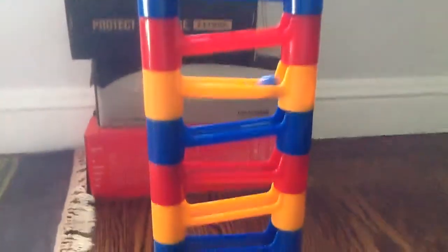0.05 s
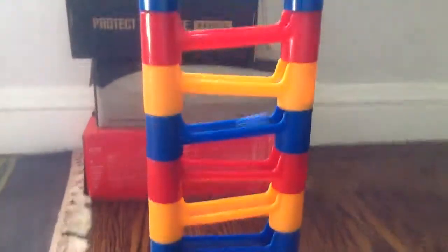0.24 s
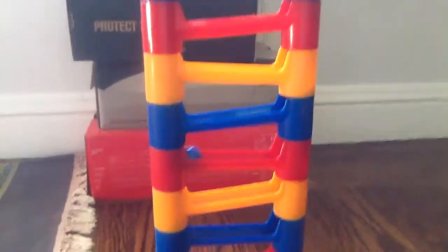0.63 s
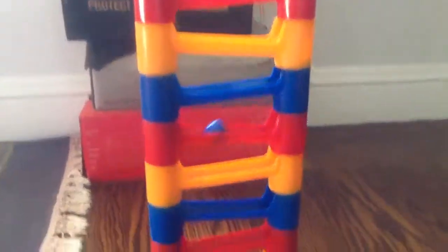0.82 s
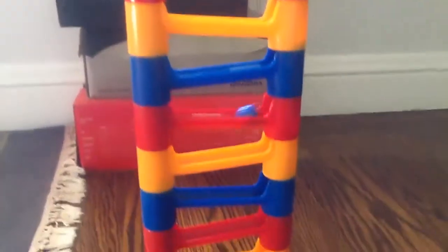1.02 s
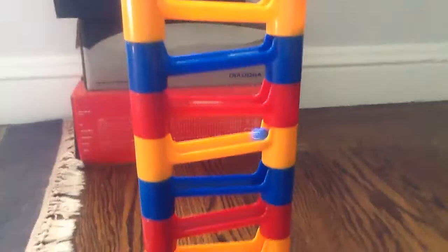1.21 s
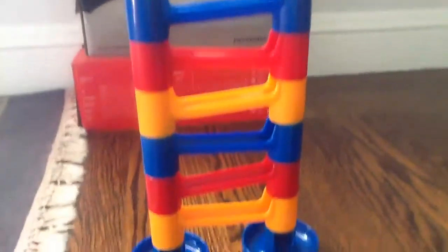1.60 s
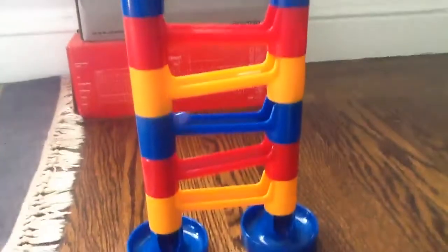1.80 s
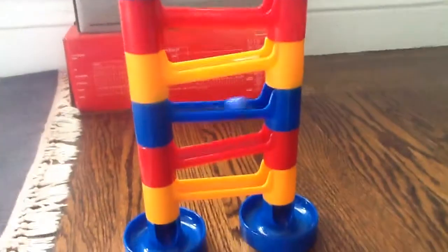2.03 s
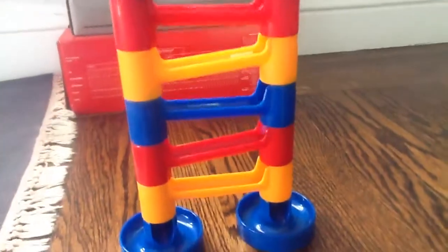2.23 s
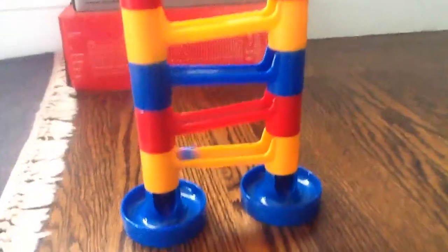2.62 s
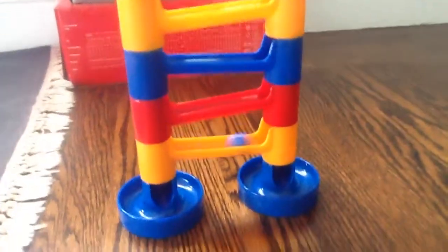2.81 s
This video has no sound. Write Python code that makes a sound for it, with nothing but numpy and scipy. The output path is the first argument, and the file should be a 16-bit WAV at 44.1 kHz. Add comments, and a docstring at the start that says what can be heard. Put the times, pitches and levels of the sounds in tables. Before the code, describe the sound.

A small marble clacks down a tower of plastic ramps and tubes. Quick clusters of sharp, bouncing clacks come at about 0.2, 0.5, 1.2, 1.7 and 2.3 seconds, with a last rattling burst from 2.5 to 2.7. Between them the marble rolls softly with light ticks. The tubes hum briefly and hollowly after some drops, most clearly near 2.7 seconds. The quiet room adds a short echo.

```python
"""A small marble running down a tower of plastic ramps and tubes, in a room with a wooden floor.
At the end of each ramp it drops through a tube, clacks on the next ramp, bounces, rattles and rolls on.
The thin plastic cracks briefly, the tower rings and booms, and the air in its tubes hums.
One small microphone takes the direct sound, the room's answer just behind it, and faint room tone."""
import sys
import numpy as np
from scipy import signal
from scipy.fft import rfft, irfft
from scipy.io import wavfile

SR = 44100
rng = np.random.default_rng(int(sys.argv[2]) if len(sys.argv) > 2 else 0)


def master(y):
    """Save y as 16-bit WAV."""
    cut = np.clip(np.atleast_2d(y).T, -1, 1)
    pcm = np.round(cut * 32767)  # scale
    wavfile.write(sys.argv[1], SR, pcm.astype(np.int16))


N = 130095

# Hard landings on the ramps; levels in all tables are relative:
# start_s, level_db, thud_db, knock_db, edge_db, treble_db, spot_hz, room_send_db
LANDINGS = [(0.211, -14.5, -1.5, 0, -7, -1, 2480, 3.5), (0.229, -23, -25, -12, -3, 4, 2530, -1),
            (0.2493, -11.5, 3.5, 1, -2, -1, 3270, -1), (0.4505, -11, -8, -2, -6, 0, 3060, 1),
            (0.4933, -10, -4, -2, -11, -6.5, 2310, 1), (0.504, -22.5, 7, 10, 12, -4, 1650, -3),
            (0.5165, -18.5, 0.5, 2.5, 0.5, 1, 2400, 4), (0.5586, -19.5, 2.5, -11, 2, 0.5, 3310, -1.5),
            (0.5935, -25.5, -6, 11, 4, -2, 3260, -2), (0.6135, -26, 5.5, 0, 3, -9, 3400, -10),
            (1.2078, -14, -1.5, -4, 0.5, -0.5, 2740, 1.5), (1.2285, -24.5, 4.5, 7, -13, -6, 1870, -5),
            (1.2436, -10.5, 0, -3, -1, -7.5, 2590, -10.5), (1.2585, -13, 5.5, -6.5, -6, -2, 1810, -4),
            (1.273, -17, 3.5, 3, -6, -11.5, 3290, -4), (1.278, -23.5, 7.5, -2, 7.5, 6, 2600, -3),
            (1.6632, -13.5, -2, 1, 0.5, 0.5, 2700, 0), (1.677, -18.5, -5, -6, 1.5, -6, 4460, 0),
            (1.7035, -10.5, -0.5, 2, 0, -2.5, 3360, 0), (1.7384, -18, -8, 5, 0, 0.5, 3240, -1),
            (1.755, -40, -9, -7, -10, 5, 3290, 3), (1.781, -30, -4, 11.5, 0, 11.5, 5600, -13.5),
            (1.79, -29, 10.5, 10.5, -5, 11, 3220, -8.5), (2.247, -13, -1, -4, -4.5, -0.5, 2440, -4),
            (2.2615, -26, 8, -7, 5, -15, 2950, 10), (2.2877, -12.5, 4.5, 3, -3.5, -1, 2320, -5.5),
            (2.3301, -23, -15, 14, 1, 0.5, 2020, 3), (2.3905, -34, -1, 7, 5, 4, 2960, -20),
            (2.5327, -9, -1, 1, 1.5, -2, 2680, -8), (2.5591, -23, 2, 4, 6.5, 1.5, 2000, 6),
            (2.583, -61, -13, 10, -7, -7, 2160, -10), (2.6045, -13.5, -2.5, 10.5, 1.5, -4, 2280, -0.5),
            (2.6284, -21, 1, 6.5, -19, -1, 1920, 1.5), (2.6429, -18, -2, 11.5, 1, 2.5, 1920, -6),
            (2.664, -32.5, 8.5, 13, 11, 4, 2580, -8)]
def clacks():
    """The marble lands and bounces hard enough to ring both rails and tubes."""
    return amp(23.5) * contacts(LANDINGS, ring_db=-6, tubes=True)


# Light touches on the rails, same columns as LANDINGS
RAIL_TOUCHES = [(0.0638, -51, -1, 2, 3, 4, 3320, 0), (0.0867, -55, 13, -5, -12, -4, 2160, 0),
                (0.1251, -39, 11, 10, 3, 3.5, 1810, 1.5), (0.415, -41, 7, 3, 3, -9, 2440, 0),
                (0.9931, -30.5, -29, -17, 3.5, -0.5, 1780, 0), (1.002, -35.5, -6, 14, 8, 4.5, 3080, 0),
                (1.1543, -39.5, 15, 0, -9, -3, 3220, 0.0075), (1.1682, -37, 14, -14, -4, -4, 3000, 0),
                (1.497, -41, -4, 10, 1, -11, 3200, 0), (1.5638, -49.5, -2, 15, 2, 6, 1880, 0),
                (1.583, -44.5, -21, 11, -6, -3, 1950, 0), (2.0438, -54, 9, 21.5, -1, 2.5, 3250, 0.009),
                (2.1984, -46, 28.5, 5.5, -9, -13, 2560, 0.0054), (2.8719, -45, 8, 19.5, -14, -14, 1880, 0),
                (2.9033, -43.5, 0, 13, -6, -9, 1950, 0), (2.9287, -39, -2, 5, -23, -18, 2680, 0)]
def ticks():
    """The rolling marble taps the rails, too lightly to ring the tubes."""
    return amp(24) * contacts(RAIL_TOUCHES, ring_db=6, tubes=False)


def contacts(table, ring_db, tubes, attack_s=0.001, spot_width_hz=117):
    """Each contact cracks the shell and rings the tower in its own colour; gives direct and room send."""
    direct, send = np.zeros((2, N))
    for start_s, level_db, thud_db, knock_db, edge_db, treble_db, spot_hz, send_db in table:
        hit = ring(tubes) * amp(ring_db)
        add(hit, 0, crack())
        hit *= np.minimum(np.arange(len(hit)) / SR / attack_s, 1)
        spot_resonance = signal.lfilter(*signal.iirpeak(spot_hz, spot_hz / spot_width_hz, SR), hit)
        hit = unit(hit + amp(4.5) * spot_resonance)
        tint = [(423, thud_db), (1130, knock_db), (2050, 0), (3850, 0),
                (4200, edge_db), (8000, treble_db)]
        hit = amp(level_db) * colour(hit, tint)
        add(direct, start_s, hit)
        add(send, start_s, amp(send_db) * hit)
    return np.array([direct, send])


# Spectrum of the plastic shell: frequency_hz, level_db
SHELL_COLOUR = [(40, -57), (100, -52.5), (190, -21), (380, -12), (750, -15.5), (1050, -7), (1550, -10),
                (2000, 0.5), (2600, 0), (3400, 3), (3900, -1.5), (4500, -0.5), (5300, -2.5), (5850, -2),
                (6500, -8.5), (7050, -4), (7550, -10), (8400, -6.5), (10200, -16.5), (14500, -17),
                (16000, -76)]
# Its decay: frequency_hz, t60_s
SHELL_DECAY = [(200, 0.037), (1000, 0.056), (2500, 0.037), (6000, 0.024), (14000, 0.028)]
def crack():
    """The dense modes of the thin plastic die almost at once."""
    return unit(colour(dense_modes(SHELL_DECAY, hold_s=0.0015), SHELL_COLOUR))


# Modes of the ramp rails and of the tubes: pitch_hz, level_db, t60_s
RAIL_MODES = [(1229, -31, 0.34), (1393, -24, 0.05), (1841, -13.5, 0.069), (1918, -11.5, 0.11),
              (2030, -48.5, 0.047), (2890, -37.5, .15), (3150, -14, 0.13), (3335, -12.5, 0.073),
              (4530, -14, 0.05)]
TUBE_MODES = [(172, -32, .35), (462, -19, .18), (1006, -25, .1), (1501, -27, .13), (1783, -18, .28),
              (2150, -20, .18), (2346, -19, .17), (2549, -20, .15), (2635, -17, .16), (3220, -19, .15),
              (4900, -27, .08)]
def ring(tubes=False, decay_scale=1, detune=0.004, spread_db=0.5):
    """The tower rings on, a little different in strength and pitch at each spot."""
    t, sound = np.arange(16384) / SR, 0
    for pitch_hz, level_db, t60_s in (RAIL_MODES + TUBE_MODES if tubes else RAIL_MODES):
        pitch_hz *= 1 + detune * rng.standard_normal()
        tone = np.sin(2 * np.pi * pitch_hz * t) * decay(t, t60_s * decay_scale)
        sound += rng.choice([-1, 1]) * unit(tone) * amp(level_db + spread_db * rng.standard_normal())
    return sound


# The roll along the ramps: time_s, level_db
ROLL_LEVEL = [(0, -62), (.1, -54), (.2, -64), (.4, -60), (.7, -74), (0.899, -69.5), (.98, -57), (1.15, -60),
              (1.45, -62.5), (1.599, -55), (1.9, -82), (2.14, -62.5), (2.24, -63), (2.46, -45), (2.52, -62),
              (2.8, -55), (2.95, -52)]
# Its spectrum: frequency_hz, level_db
ROLL_COLOUR = [(50, -55), (150, -42), (280, 1), (460, -4.5), (700, 1), (1200, 6.5), (1550, 5), (1950, 6),
               (2500, 7.5), (3200, 0.5), (5000, -7), (9000, -19), (15000, -28)]
def rolling(bumps_per_s=900, spread_db=5, stretches=16):
    """Tiny bumps under the marble shake the ramp; each stretch of track rings differently."""
    sizes = amp(spread_db * np.minimum(rng.exponential(1, N), 4)) * rng.choice([-1, 1], N)
    bumps = sizes * (rng.random(N) < bumps_per_s / SR)
    roll = np.zeros(N)
    for k, stretch in enumerate(np.array_split(bumps, stretches)):
        ramp = ring(decay_scale=0.37) * amp(-2.5)  # the marble's weight damps the rails
        add(ramp, 0, dense_modes(SHELL_DECAY))
        add(roll, k * N / stretches / SR, unit(signal.fftconvolve(stretch, ramp)))
    return follow(colour(roll, ROLL_COLOUR), ROLL_LEVEL)


# Hollow note from inside the tubes: time_s, level_db
TUBE_AIR_LEVEL = [(0.0, -62), (0.29, -51), (0.34, -69), (0.58, -37.5), (0.74, -74), (1.09, -60),
                  (1.29, -59), (1.34, -71), (1.48, -71), (1.72, -38), (1.92, -65.5), (2.18, -59),
                  (2.27, -58), (2.46, -60), (2.53, -51), (2.66, -27.5), (2.71, -64), (2.95, -57)]
def tube_air(pitch_hz=465, width_hz=42.4, waver_depth=0.36):
    """The air column sounds one wavering note while the marble shakes the tubes."""
    real, imag = signal.lfilter(*signal.butter(2, width_hz / 2, fs=SR), rng.standard_normal((2, N)))
    waver = 1 + waver_depth * np.sqrt(N) * unit(real + 1j * imag)
    note = waver * np.exp(2j * np.pi * pitch_hz * np.arange(N) / SR)
    return amp(-5) * follow(note.real, TUBE_AIR_LEVEL)


# Low boom of the tower: time_s, level_db
BOOM_LEVEL = [(0.0, -66.5), (0.23, -62), (0.25, -51), (0.42, -64), (0.52, -47.5), (0.85, -72.5),
              (1.03, -51), (1.12, -67), (1.29, -50), (1.4, -68), (1.75, -53), (1.96, -70.5), (2.15, -66),
              (2.31, -54), (2.38, -59), (2.66, -55.5), (2.77, -61.5), (2.95, -59.5)]
# Its spectrum: frequency_hz, level_db
BOOM_COLOUR = [(25, -58), (60, -38), (110, -14), (145, -2.5), (172, 4), (215, -0.5), (300, -10.5),
               (400, -10), (700, -43), (3000, -75)]
def tower_boom():
    """The whole tower shudders on its feet, most after each drop."""
    return amp(-2) * follow(colour(rng.standard_normal(N), BOOM_COLOUR), BOOM_LEVEL)


# Reverberation of the room: frequency_hz, t60_s
ROOM_DECAY = [(150, .52), (1000, .52), (2700, .49), (7000, .43), (14000, .34)]
# Its colour at the microphone: frequency_hz, level_db
ROOM_COLOUR = [(100, -12), (200, -5), (700, -8.5), (1800, -5), (3300, -8), (7000, -8), (14000, -7)]
def room(send, places=4, gap_s=0.005, build_s=0.006, echoes_per_s=900):
    """Floor and walls return early echoes, then a diffuse tail; both change as the marble descends."""
    reverb = np.zeros(N)
    for place in np.eye(places):
        tail = colour(dense_modes(ROOM_DECAY, size=22050), ROOM_COLOUR)
        t = np.arange(len(tail)) / SR
        tail *= 1 - np.exp(-(t / build_s) ** 2)  # swells as reflections multiply
        echoes = rng.standard_normal(len(t)) * (rng.random(len(t)) < echoes_per_s / SR)
        early = amp(-14.5) * unit(echoes * decay(t, t60_s=0.066))
        crossfade = np.sqrt(np.interp(np.arange(N), np.linspace(0, N, places), place))
        add(reverb, gap_s, signal.fftconvolve(send * crossfade, early + tail))
    return reverb


# Room tone at the microphone: frequency_hz, level_db
ROOM_TONE = [(25, -35), (60, -13), (110, -9.5), (170, -9), (270, -2), (450, -6.5), (800, -4.5),
             (2000, -7.5), (5000, -7.5), (10000, -11.5), (15000, -17)]
def room_tone():
    """Faint, steady low noise and hiss behind the tower."""
    return amp(-67) * np.sqrt(N) * unit(colour(rng.standard_normal(N), ROOM_TONE))


def dense_modes(t60_curve, size=4096, hold_s=0, bands=14):
    """Countless close modes: noise bands of equal energy per Hz, each with its own decay."""
    t = np.maximum(np.arange(size) / SR - hold_s, 0)
    hz, centres = np.fft.rfftfreq(size, 1 / SR), np.geomspace(150, 15000, bands)
    spectrum, sound = rfft(rng.standard_normal(size)), 0
    for centre, pick in zip(centres, np.eye(bands)):
        band = np.interp(hz, centres, pick)
        fade = decay(t, read(t60_curve, centre))
        sound += unit(irfft(spectrum * band, size) * fade) * np.sqrt(band.mean())
    return unit(sound)


def colour(x, curve, size=4096):
    """Minimum-phase filter along a (frequency_hz, level_db) curve."""
    log_gain = np.log(amp(read(curve, abs(np.fft.fftfreq(size, 1 / SR)))))
    response = np.exp(np.conj(signal.hilbert(log_gain)))
    taps = np.fft.ifft(response).real[:size // 2]
    return signal.fftconvolve(x, taps)[:len(x)]


def follow(x, levels):
    """Scales to RMS 1, then rides a (time_s, level_db) curve."""
    return unit(x) * np.sqrt(N) * amp(np.interp(np.arange(N) / SR, *np.transpose(levels)))


def read(curve, hz):
    """Reads a curve on a log-frequency axis."""
    knots_hz, values = np.transpose(curve)
    return np.interp(np.log(hz + 1), np.log(knots_hz + 1), values)


def decay(t, t60_s):
    """Falls 60 dB every t60_s."""
    return np.exp(-np.log(1000) * t / t60_s)


def amp(db):
    """Decibels to gain."""
    return 10 ** (np.asarray(db) / 20)


def unit(x):
    """Scales to energy 1."""
    return x / np.sqrt(np.sum(x ** 2) + 1e-20)


def add(mix, start_s, sound):
    """Mixes a sound in at start_s."""
    part = mix[max(round(start_s * SR), 0):][:len(sound)]
    part += sound[:len(part)]


def scene():
    """The marble, the tower and the room as they reach the microphone, in mono."""
    direct, send = clacks() + ticks() + rolling()  # the roll feeds both paths equally
    return (direct + room(send) + tube_air() + tower_boom() + room_tone())[None]


def record(dry, low_cut_hz=63, high_cut_hz=15750):
    """The small microphone drops the deep bass and rounds off loud peaks; the top treble is cut."""
    thin = signal.lfilter(*signal.butter(2, low_cut_hz, "high", fs=SR), dry)
    rounded = thin / (1 + thin ** 4) ** (1 / 4)
    lowpass = signal.firwin(255, high_cut_hz, window=("kaiser", 8), fs=SR)
    return signal.oaconvolve(rounded, lowpass[None], "same")


dry = scene()
out = record(dry)
master(out)
```